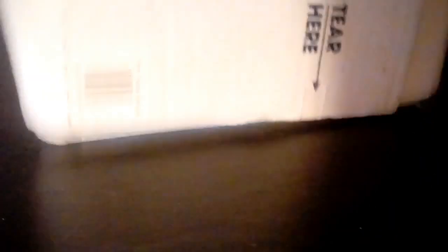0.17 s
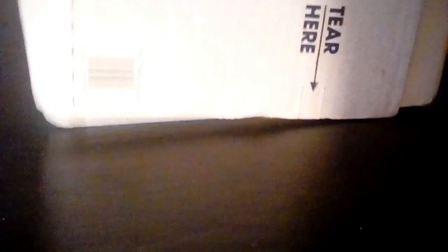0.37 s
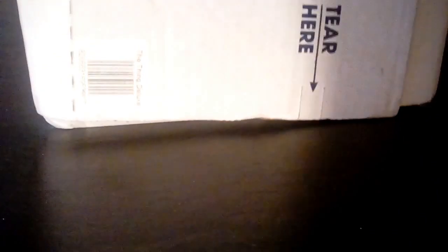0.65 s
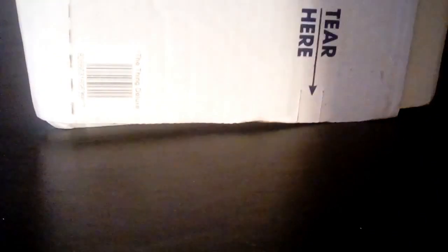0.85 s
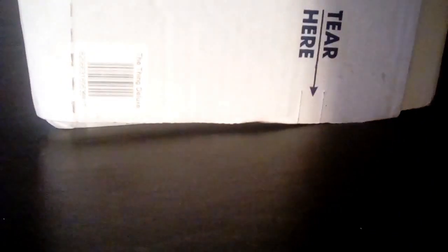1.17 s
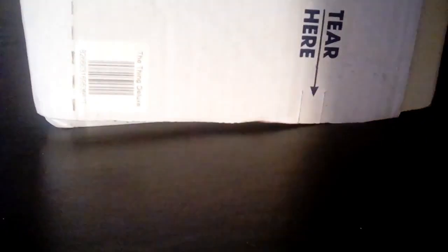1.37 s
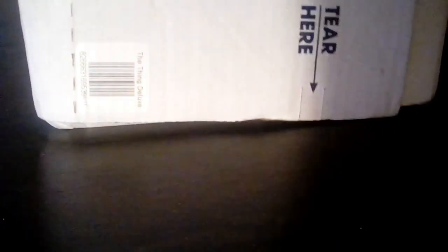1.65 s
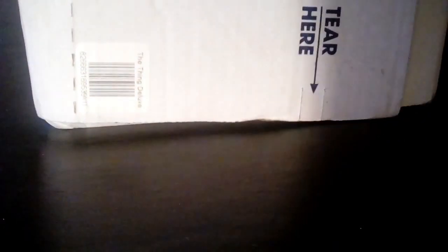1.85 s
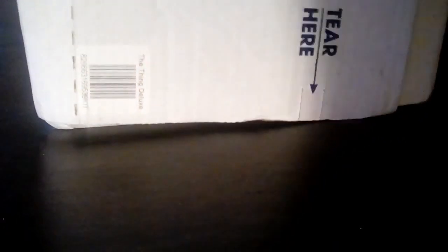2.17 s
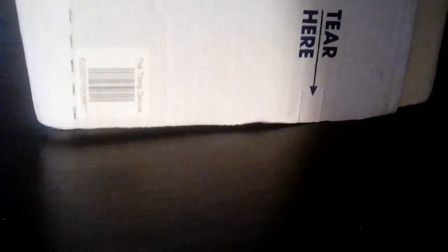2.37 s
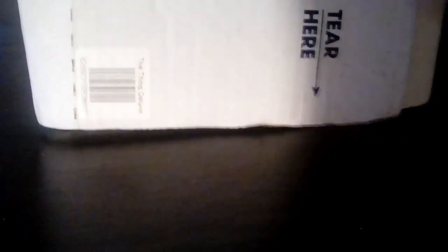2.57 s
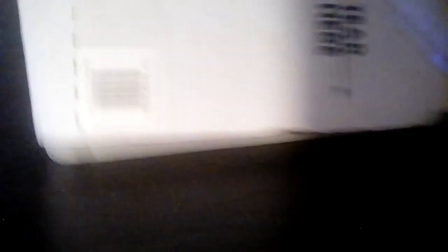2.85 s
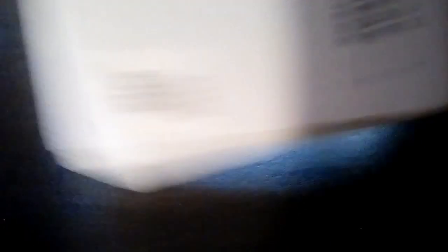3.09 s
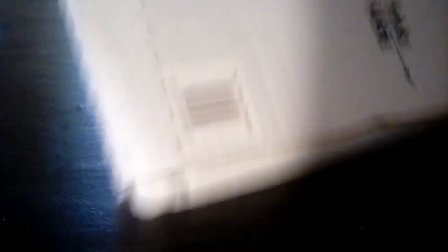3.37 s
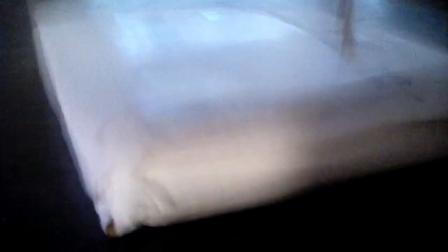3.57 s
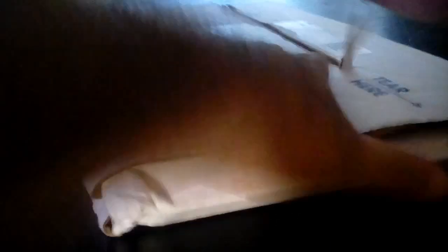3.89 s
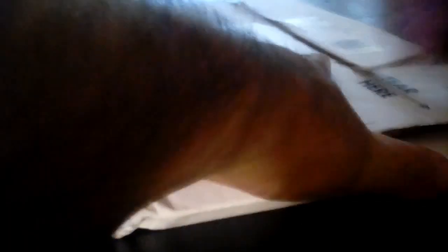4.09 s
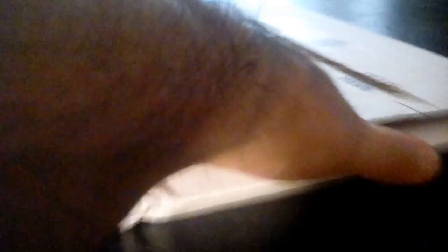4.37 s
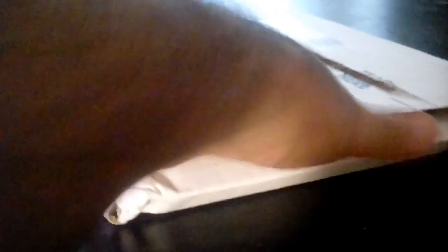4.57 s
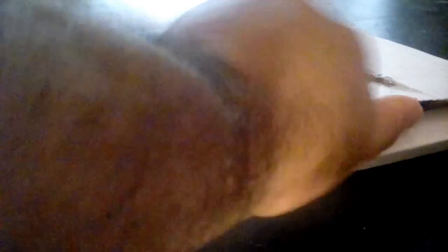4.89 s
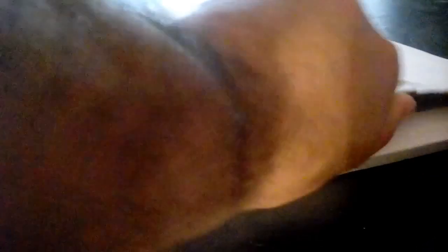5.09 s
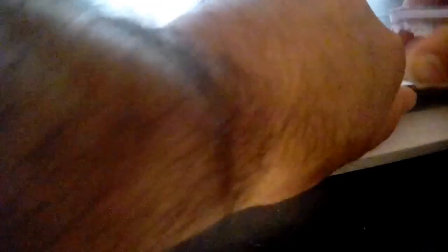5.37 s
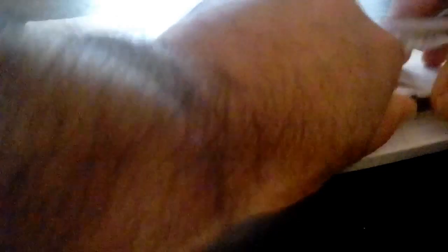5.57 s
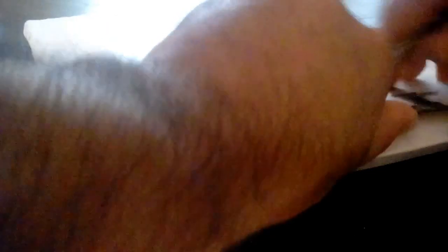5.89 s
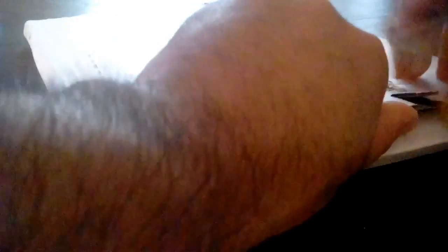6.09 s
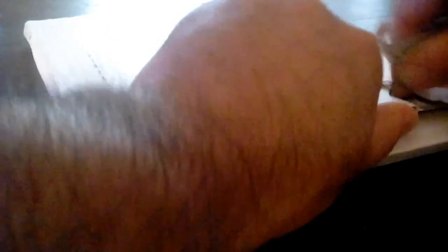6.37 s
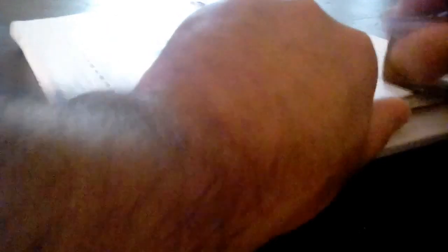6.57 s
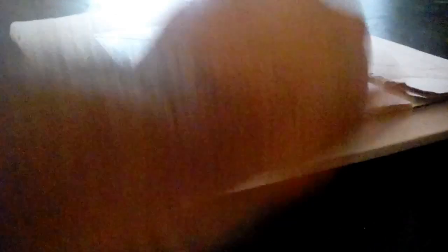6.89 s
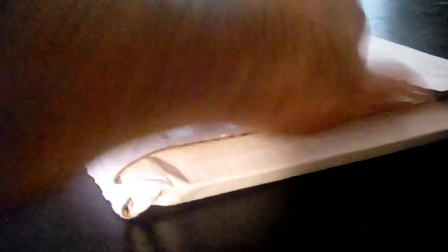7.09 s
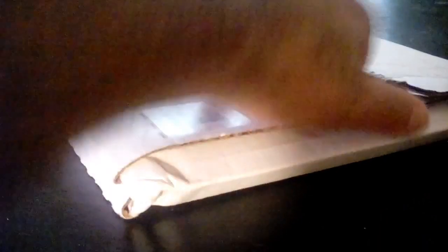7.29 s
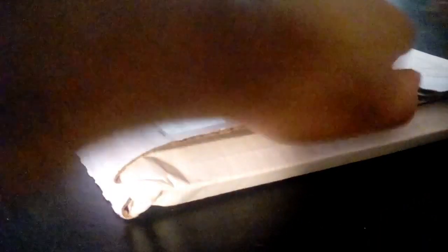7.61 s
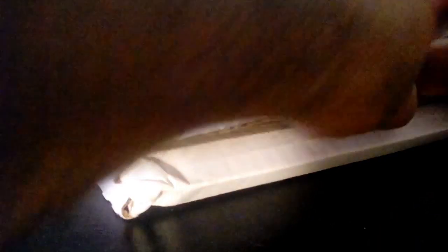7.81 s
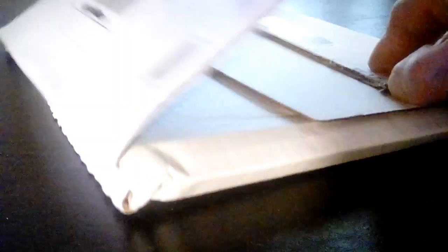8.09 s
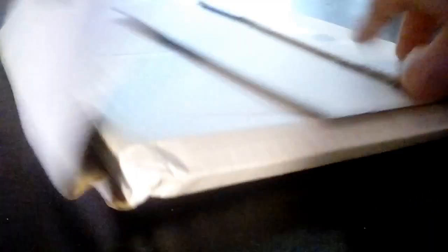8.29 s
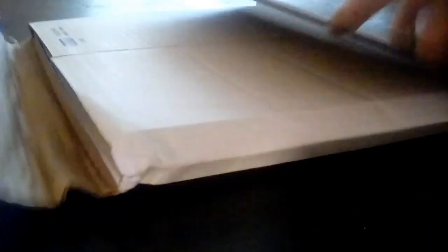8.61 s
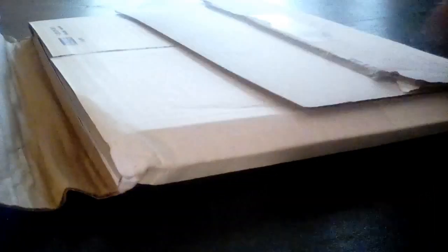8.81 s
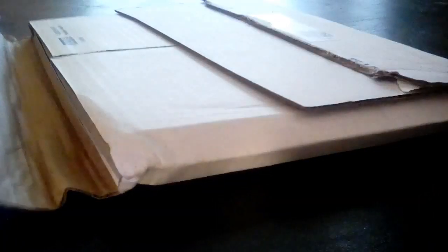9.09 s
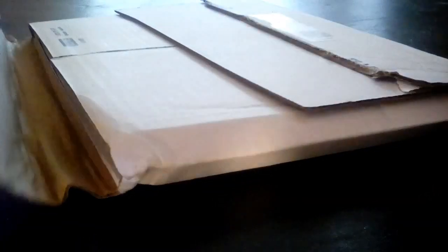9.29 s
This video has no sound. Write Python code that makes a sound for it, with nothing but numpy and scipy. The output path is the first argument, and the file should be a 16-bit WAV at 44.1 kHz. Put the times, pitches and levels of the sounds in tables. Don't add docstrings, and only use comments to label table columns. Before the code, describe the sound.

A flat cardboard mailer is set down and slid on a table, then its tear strip rips open in two loud crackling pulls amid soft rustling.

```python
import sys
import numpy as np
from scipy import signal
from scipy.io import wavfile
from scipy.ndimage import uniform_filter1d

SR = 44100
rng = np.random.default_rng(int(sys.argv[2]) if len(sys.argv) > 2 else 0)


def output_pcm(signal):
    pcm = np.clip(np.atleast_2d(signal).T, -1, 1) * 32767
    wavfile.write(sys.argv[1], SR, np.round(pcm).astype(np.int16))


def magnitude_from_level(level_db):
    exponent = np.asarray(level_db, float) / 20
    return 10 ** exponent


N = 416744

# frequency in Hz, level in dB per Hz.
AIR_SPECTRUM = [(15, -49), (25, 0), (64, -15), (109, -31), (163, -3), (243, -8.5), (286, -4.5),
                (573, -11.5), (790, -13), (879, -12.5), (1860, -19.5), (2300, -22.5), (6370, -31.5),
                (15000, -79)]
# frequency in Hz, width in Hz, level in dB.
HUM_MODES = [(120.7, 3.2, -59.5), (235, 14.7, -57), (806.5, 9.8, -71.5)]
# frequency in Hz, t60 in seconds.
ROOM_T60 = [(200, 0.22), (700, 0.12), (2000, 0.083), (6000, 0.13), (14000, 0.18)]

# frequency in Hz, width in Hz, level in dB.
CRACK_MODES = [(1370, 670, -2.5), (2110, 860, -0.5), (2470, 585, -2), (3330, 600, -7)]
# frequency in Hz, width in Hz, level in dB.
FIZZ_MODES = [(4570, 910, 7.5), (5800, 570, 6.5), (6150, 780, 8.5), (8450, 7800, -11.5)]
# start in seconds, panel ring peak in dB, panel frequency in Hz,
# crack in dB over the ring, fizz in dB over the ring.
KNOCKS = [(0.179, -27, 820, 1.5, -30), (0.219, -10, 630, -7, -25), (0.258, -21.5, 700, -3, -19),
          (0.268, -12.5, 515, -13.5, -27), (0.343, -34.5, 396, -16, -22), (5.916, -47, 894, 10.5, 0),
          (5.972, -29, 444, -5, -7.5), (5.981, -35, 480, 4.5, -4), (6.018, -31.5, 590, -14, -6),
          (6.776, -29.5, 983, -6, -4), (6.807, -17.5, 650, -12, -16), (6.816, -14.5, 1070, 2.5, -10.5),
          (6.831, -11, 500, -10, -26), (6.846, -17, 634, -14, -27), (6.914, -17, 510, -12.5, -40),
          (7.567, -36, 1060, 9.5, 1.5), (8.074, -32, 1000, .1, -4), (8.037, -53, 900, 11, 0),
          (8.096, -29, 1190, -16, -15)]
# start in seconds, panel ring peak in dB, panel frequency in Hz,
# crack in dB over the ring, fizz in dB over the ring.
FIRST_PULL = [(3.605, -58, 478, -4, 13), (3.612, -55, 354, 0, 17), (3.713, -9.5, 754, -32, -37),
              (3.735, -14, 477, -8, -27), (3.754, -31, 510, -5, -31), (3.761, -17, 549, -16, -34),
              (3.7896, -15, 630, -2.5, -20), (3.796, -11, 380, -10, -27), (3.813, -7, 626, -19, -24),
              (3.848, -6.5, 406, 4, -16.5), (3.8481, -19, 1300, -7, -25), (3.857, -8, 600, -18, -44),
              (3.863, 1.5, 550, -7.5, -17), (3.877, -37, 510, 13, 0), (3.882, -6.5, 616, -8, -15),
              (3.914, -8.5, 500, -5, -25), (3.914, -19, 724, -11, -13), (3.933, -10, 600, -25, -40),
              (3.965, -14.5, 530, -10, -20), (3.966, -30, 900, -4, -22), (3.985, -12.5, 615, -15, -29),
              (4.025, -32.5, 368, -3, -24), (4.165, -31.5, 520, 1.5, -15)]
# start in seconds, panel ring peak in dB, panel frequency in Hz,
# crack in dB over the ring, fizz in dB over the ring.
SECOND_PULL = [(4.257, -19.5, 600, -15, -8.5), (4.292, -10, 540, -14, -29), (4.322, -13.5, 620, -22, -24),
               (4.365, -17, 633, -8, -11), (4.46, -20.5, 378.6, -2.5, -8), (4.486, -19, 530, -11, -27),
               (4.515, -11.5, 631.6, -18, -22), (4.527, -7.5, 1200, -14, -11.5), (4.531, -9, 470, 0, -16),
               (4.535, -16.5, 1300, -11, -24), (4.552, -27, 517, -12, -29), (4.584, -21.5, 377, -5.5, -26),
               (4.622, -12, 522, -9, -31), (4.641, -22, 620, -31, -38), (4.691, -42, 378, 1, -15),
               (4.717, -18.5, 650, -4, -16.5), (4.757, -21, 500, -15, -34)]
# start in seconds, panel ring peak in dB, panel frequency in Hz,
# crack in dB over the ring, tearing time in ms.
PEELS = [
    (.184, -28.5, 530, -13, 20),
    (3.720, -16.5, 741, -26, 19),
    (6.023, -35, 497, -11, 6),
    (6.781, -29.5, 1050, 0, 10),
    (7.573, -44.5, 1250, -9, 42),
    (8.086, -29, 1090, -19, 39),
]
# start in seconds, peak in dB.
FIBRE_TICKS = [(1.0534, -47), (1.5122, -33), (3.5294, -39), (3.5683, -48), (3.6244, -51), (6.536, -53),
               (6.6256, -45), (7.33, -43.5), (7.84, -49), (8.632, -39.5), (8.8283, -44), (8.8825, -41),
               (9.0004, -48), (9.0674, -47), (9.196, -45)]
# start in seconds, level in dB, frequency in Hz, t60 in seconds.
STRIP_PING = (4.529, -23, 6020, .05)
# start in seconds, panel ring peak in dB, panel frequency in Hz,
# crack in dB over the ring, fizz in dB over the ring.
FLAP_POP = (8.0792, -5, 1172, -17, -10.5)
SNAP_MS, FLAP_MS = 1.11, 0.26
PEEL_FIZZ_DB = -3
TICK_HZ, TICK_RING_DB, TICK_CRACK_DB, TICK_FIZZ_DB = 900, -12.5, 5, 8

# peak in seconds, thud in dB, rise in seconds, fall in seconds.
BUMPS = [(.18, -39.5, .045, 0.39), (1.24, -25, 0.057, 0.11), (1.5, -34.5, 0.36, 0.061),
         (2.55, -29.5, 0.048, 0.22), (3.32, -45, .1, 0.067), (3.73, -30.5, 0.033, 0.27),
         (3.95, -35, 0.17, 0.11), (4.26, -34.5, 0.029, 0.44), (4.47, -38.5, 0.44, 0.28),
         (5.97, -42.5, 0.033, 0.18), (6.83, -27, .04, 0.057), (7.31, -62, 0.65, .2),
         (8.1, -44.5, 0.064, 0.12), (9.05, -51, .24, 0.1), (9.24, -55, .1, 0.35)]
# peak in seconds, rustle in dB, rise in seconds, fall in seconds.
STROKES = [(.744, -70, .3, .03), (1.1, -54, 0.32, 0.18), (1.56, -61, 0.046, 0.1), (1.834, -64, 0.18, .04),
           (2.25, -55.5, 0.18, .22), (2.46, -61, 0.17, .03), (3.214, -58, 0.3, 0.034),
           (3.394, -64, 0.033, 0.04), (3.62, -57.5, 0.49, 0.051), (5.486, -64.5, 0.16, 0.088),
           (5.75, -72.5, 0.49, 0.18), (6.234, -67, 0.084, 0.11), (7.31, -57, 0.21, 0.029),
           (7.45, -70, 0.75, .5)]
# peak in seconds, rustle in dB, rise in seconds, fall in
# seconds.
PICKS = [(.4, -66, .15, 0.24), (3.0, -67, .05, 0.31), (4.0, -66, 0.37, 0.14), (4.24, -57, 0.35, .02),
         (4.6, -68, .1, .3), (4.73, -69, .1, .15), (4.92, -60, 0.21, 0.37), (5.296, -68.5, 0.48, 0.02),
         (5.95, -60, 0.13, 0.3), (6.378, -59, 0.026, 0.098), (6.77, -57, 0.2, 0.026),
         (6.87, -65, .05, 0.17), (7.044, -56.5, 0.034, 0.053), (7.633, -62, 0.11, 0.03),
         (7.941, -67.5, .2, 0.049), (8.144, -54.5, 0.12, 0.16), (8.376, -55.5, 0.08, 0.2),
         (8.722, -57, 0.29, 0.082), (8.858, -58.5, 0.076, 0.11), (9.048, -61.5, 0.16, 0.22),
         (9.2, -61, .2, .12), (9.32, -60, .05, 0.073), (9.44, -64.5, .12, .3)]
# frequency in Hz, level in dB per Hz.
RUSTLE_SPECTRUM = [(2060, -17), (3500, -2.5), (4810, -2.5), (6360, 4.5), (7370, -0.5), (8630, -4.5),
                   (9870, -7.5), (14900, -21.5), (16000, -13)]
STROKE_MID_DB, PICK_MID_DB = -9.5, -1
GRIP_DB, GRIP_S = -71, 0.24

# time in seconds, pressure on the table in dB, skid in dB, air gap in Hz, slips per second.
SLIDES = [
    [(1.16, -52.5, 11, 249, 65.), (1.234, -28.5, 1, 321, 109), (1.29, -22, -0.5, 370, 200.),
     (1.315, -27, 4.5, 280, 202), (1.41, -24, 1.5, 232, 232), (1.45, -25.5, -1, 225, 150.),
     (1.534, -48.5, .1, 210, 82), (1.58, -81, -3, 243, 73)],
    [(2.45, -58.5, 13, 284, 85.), (2.544, -23, -2.5, 271, 90.), (2.63, -24, -5, 286, 100.),
     (2.74, -18, -3.5, 306, 250), (2.775, -28, -1.5, 355, 195), (2.855, -23, -3, 353, 260.),
     (2.895, -13.5, .5, 352, 347), (2.962, -43.5, -4.5, 334.5, 200.), (3.1, -65, 16, 314.2, 150.)],
    [(4.23, -49.5, 9, 318, 89), (4.282, -28.5, 0.5, 416, 89), (4.37, -35.5, 0.5, 407, 101),
     (4.385, -29.5, -0.5, 303, 110.), (4.468, -29.5, 1.5, 306, 107), (4.51, -42, 5.5, 403, 90.)],
]
# start in seconds, length in seconds, pressure in dB, skid in dB,
# air gap in Hz.
JERKS = [
    (3.712, 0.052, -21, -10.5, 363),
    (3.752, 0.045, -29, -10, 369),
    (4.633, .04, -39, -12, 400),
    (4.545, 0.069, -32, -8.5, 389),
    (5.96, 0.093, -44, 0.5, 307),
    (6.773, 0.096, -33.5, 3.5, 298),
]
# frequency in Hz, width in Hz, level in dB.
BODY_MODES = [(101, 49, -5.5), (164, 75, -1), (235, 133, -2), (345, 58, 1), (420, 93, -5.5),
              (700, 310, -14.5)]
# frequency in Hz, level in dB per Hz.
EDGE_SPECTRUM = [(440, -35.5), (750, 2), (847, 2.5), (919, 1.5), (1340, -5.5), (1470, -4), (1630, -15.5),
                 (2020, -9.5), (2280, -18.5), (3800, -23), (4940, -36), (8360, -120)]
# frequency in Hz, level in dB per Hz.
HISS_SPECTRUM = [(1760, -7), (3000, 0), (3400, -3.5), (4290, -6), (5140, -0.5), (5920, -0.5), (7460, -3),
                 (8050, -7), (13200, -15.5), (14900, -18), (16000, -24)]
JERK_PEAK_SHARE, JERK_ENDS_DB, JERK_SLIPS_PER_S = 0.3, -14, 140.0
EDGE_DB, HISS_DB, HISS_DB_PER_SKID_DB = -6, -14, 1
HISS_STEADY = 0.18


def evened(x):
    return x / np.sqrt(np.mean(x ** 2) + 1e-20)


def read(points, hz):
    f, value = np.transpose(points)
    return np.interp(np.log(hz + 1), np.log(f + 1), value)


def add(mix, start_s, sound):
    part = mix[round(start_s * SR):][:len(sound)]
    part += sound[:len(part)]


def resonate(x, hz, width_hz):
    return signal.lfilter(*signal.iirpeak(min(hz, SR / 2.2), hz / width_hz, SR), x)


def modes(x, table, stretch=0.93):
    total = 0
    for k, (hz, width_hz, db) in enumerate(table):
        total = total + (-1) ** k * magnitude_from_level(db) * resonate(x, hz * stretch, width_hz)
    return total


def noise(spectrum, size, patchy_db, flicker_db):
    frames = N // (size // 4) + 5
    hz = np.fft.rfftfreq(size, 1 / SR)
    a, b, patches = rng.standard_normal((frames, len(hz), 3)).T
    patches = uniform_filter1d(patches, size // 64, 0)
    patches = evened(uniform_filter1d(patches, 12000 // size, 1))
    flicker = evened(uniform_filter1d(rng.standard_normal(frames), 3))
    level_db = read(spectrum, hz)[:, None] + patchy_db * patches + flicker_db * flicker
    z = (a + 1j * b) * magnitude_from_level(level_db)
    return evened(signal.istft(z, nperseg=size, noverlap=3 * size // 4)[1][:N])


def air():
    hum = sum(magnitude_from_level(db) * evened(resonate(rng.standard_normal(N), hz, width_hz)) for hz, width_hz, db in HUM_MODES)
    return magnitude_from_level(-56) * noise(AIR_SPECTRUM, 1024, patchy_db=1.5, flicker_db=1.56) + hum


def snap(ring_db, hz, crack_db, fizz_db, tear_ms, chance):
    t = np.arange(len(chance)) / SR
    decay = np.exp(-t * 1000 / max(tear_ms, 0.2)) + 0.16 * np.exp(-t * 220)
    breaks = np.clip(chance, -2.2, 2.2) ** 3 * decay
    breaks[0] = 13.7
    jolt = signal.lfilter([1], [1, -0.8], breaks)
    ring = resonate(jolt, hz, 0.21 * hz * max(hz / 620, 1) ** 0.35)
    ring = ring + (300 / hz) ** 2 * resonate(jolt, 354, 110)
    ring = ring + (400 / hz) ** 3 * resonate(jolt, hz * 1.62, 0.53 * hz)
    ring = resonate(resonate(ring, 720, 6900), 800, 9600)
    place = np.exp(0.097 * chance[-1])
    fizz = resonate(resonate(modes(breaks, FIZZ_MODES, place), 6200, 6700), 5900, 11000)
    crack = resonate(resonate(modes(breaks, CRACK_MODES, place), 2060, 3000), 2260, 6500)
    parts = ((ring, 0), (crack, crack_db), (fizz, fizz_db + 2.5))
    return sum(magnitude_from_level(ring_db + db) * part / abs(part).max() for part, db in parts)


def ping():
    _, db, hz, t60_s = STRIP_PING
    t = np.arange(4000) / SR
    attack = np.minimum(t / 0.0011, 1)
    return magnitude_from_level(db - 60 * t / t60_s) * np.sin(2 * np.pi * hz * t) * attack


def strip():
    tears = [(*row, SNAP_MS) for row in KNOCKS + FIRST_PULL + SECOND_PULL]
    for s, db, hz, crack_db, tear_ms in PEELS:
        tears.append((s, db, hz, crack_db, crack_db + PEEL_FIZZ_DB, tear_ms))
    for s, db in FIBRE_TICKS:
        tears.append((s, db + TICK_RING_DB, TICK_HZ, TICK_CRACK_DB, TICK_FIZZ_DB, SNAP_MS))
    tears.append((*FLAP_POP, FLAP_MS))
    out = np.zeros(N)
    chances = rng.standard_normal((len(tears), 6000))
    for (s, *settings), chance in zip(tears, chances):
        add(out, s + 0.0014, snap(*settings, chance))
    add(out, STRIP_PING[0], ping())
    return out


def swells(rows):
    t = np.arange(0, N / SR + 0.002, 0.001)[:, None]
    peak_s, db, rise_s, fall_s = np.transpose(rows)
    gain = magnitude_from_level(db - 20 * np.maximum((peak_s - t) / abs(rise_s), (t - peak_s) / abs(fall_s)))
    return np.interp(np.arange(N) / SR, t[:, 0], np.sqrt((gain ** 2).sum(1)))


def hands():
    strokes, picks = swells(STROKES), swells(PICKS)
    grip = magnitude_from_level(GRIP_DB) * (np.arange(N) > GRIP_S * SR)
    grains = magnitude_from_level(2.8 * np.minimum(rng.exponential(1, N), 4))
    grains = grains * (rng.random(N) < 1500 / SR) * rng.choice([-1, 1], N)
    mid_gain = magnitude_from_level(STROKE_MID_DB) * strokes + magnitude_from_level(PICK_MID_DB) * picks + grip
    mid = mid_gain * evened(modes(grains, CRACK_MODES))
    rustle = noise(RUSTLE_SPECTRUM, 256, patchy_db=3.5, flicker_db=3.0)
    rustle = rustle + 0.42 * evened(modes(grains, FIZZ_MODES))
    thud = resonate(rng.standard_normal(N), 94.0, 71)
    thud = evened(resonate(resonate(thud, 76, 130), 76, 130))
    return np.hypot(strokes, picks) * rustle + mid + swells(BUMPS) * magnitude_from_level(-1.5) * thud


def glide(x, hz, width_hz):
    turn = np.exp(2j * np.pi * np.cumsum(hz) / SR)
    r = np.exp(-np.pi * width_hz / SR)
    return 2 * (turn * signal.lfilter([1 - r], [1, -r], x / turn)).real


def colour(x, spectrum):
    gain = np.log(magnitude_from_level(read(spectrum, abs(np.fft.fftfreq(4096, 1 / SR)))))
    taps = np.fft.ifft(np.exp(np.conj(signal.hilbert(gain)))).real[:2048]
    return signal.oaconvolve(x, taps)[:len(x)]


def jerk_slides():
    shape = ((0, JERK_ENDS_DB), (JERK_PEAK_SHARE, 0), (1, JERK_ENDS_DB))
    return [[(s + share * length_s, db + drop_db, skid_db, hz, JERK_SLIPS_PER_S) for share, drop_db in shape]
            for s, length_s, db, skid_db, hz in JERKS]


def slides():
    out = np.zeros(N)
    hiss = noise(HISS_SPECTRUM, 256, patchy_db=2.5, flicker_db=1.8)
    wobble, size, grit = rng.standard_normal((3, N))
    wobble = np.exp(0.3 * evened(uniform_filter1d(wobble, 150)))
    for rows in SLIDES + jerk_slides():
        s, *columns = np.transpose(rows)
        at = slice(round(s[0] * SR), round(s[-1] * SR))
        t = np.arange(at.start, at.stop) / SR
        body_db, skid_db, hollow_hz, slips_per_s = (np.interp(t, s, c) for c in columns)
        turns = np.cumsum(slips_per_s * wobble[at]) / SR
        slips = evened(np.diff(np.floor(turns), prepend=0) * magnitude_from_level(3.4 * size[at]))
        gate = 0.62 + np.exp(-(turns % 1) / 0.35)
        push = slips + 0.39 * grit[at]
        body = evened(modes(push, BODY_MODES)) + 0.47 * evened(glide(push, hollow_hz, 123))
        body = evened(resonate(resonate(body, 313, 1550), 290, 1300))
        edge = evened(colour(0.72 * slips + gate * grit[at], EDGE_SPECTRUM))
        hiss_db = HISS_DB + HISS_DB_PER_SKID_DB * skid_db - HISS_STEADY * (body_db + 25)
        paper = evened(hiss[at] * gate ** (130 / slips_per_s))
        sound = body + magnitude_from_level(EDGE_DB + skid_db) * edge + magnitude_from_level(hiss_db) * paper
        out[at] += magnitude_from_level(body_db) * sound * signal.windows.tukey(len(t), 0.06)
    return out


def room(x):
    taps = np.zeros(SR // 2)
    at = np.arange(200, len(taps) - 20, 20)
    taps[at + rng.integers(0, 20, len(at))] = rng.choice([-1.0, 1.0], len(at))
    hz, t, z = signal.stft(taps, SR, nperseg=256)
    decay = magnitude_from_level(-60 * t / read(ROOM_T60, hz)[:, None])
    tail = signal.istft(z * decay, SR, nperseg=256)[1]
    return signal.fftconvolve(x, tail / np.linalg.norm(tail))[:N]


def scene():
    snaps, rubs = strip(), slides()
    tails = magnitude_from_level(-21) * room(snaps) + magnitude_from_level(-16) * room(rubs)
    return (snaps + rubs + tails + hands() + air())[None]


def roll_off(x):
    return signal.sosfilt(signal.butter(12, 16510, fs=SR, output="sos"), x)


def record(dry):
    dry = signal.lfilter(*signal.butter(2, 42, "high", fs=SR), dry)
    dry = 0.9 * np.tanh(dry / 0.9)
    taps = signal.firwin(301, 15800, window=("kaiser", 5), fs=SR)
    return roll_off(signal.oaconvolve(dry, taps[None], "same"))


dry = scene()
out = record(dry)
output_pcm(out)
```